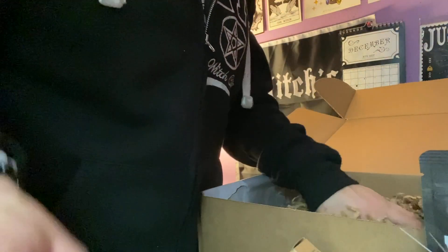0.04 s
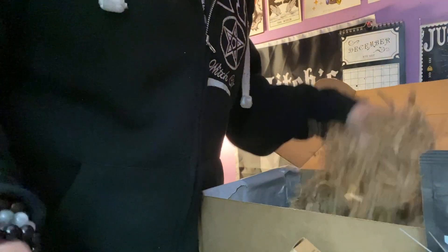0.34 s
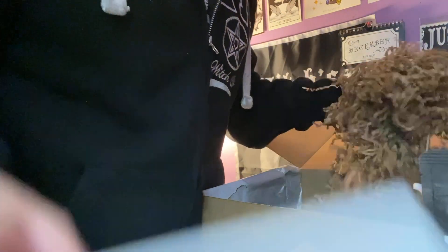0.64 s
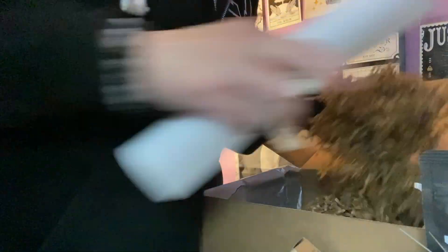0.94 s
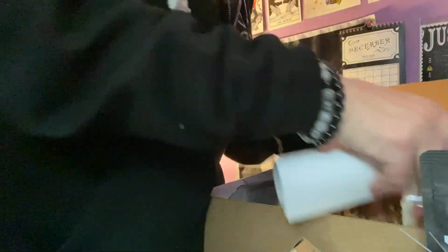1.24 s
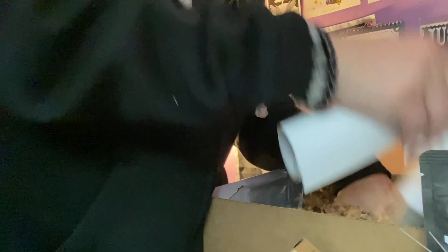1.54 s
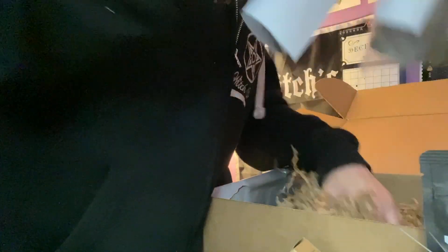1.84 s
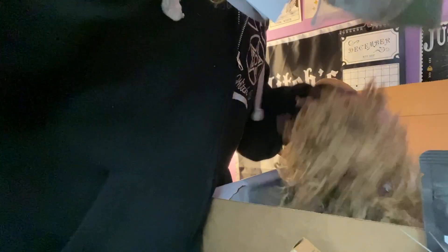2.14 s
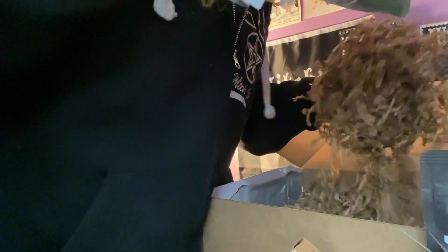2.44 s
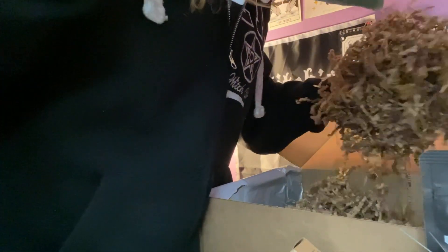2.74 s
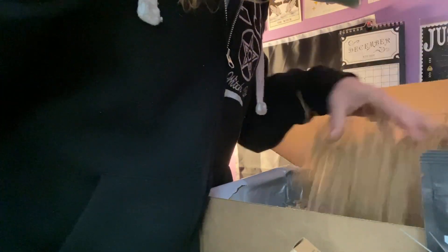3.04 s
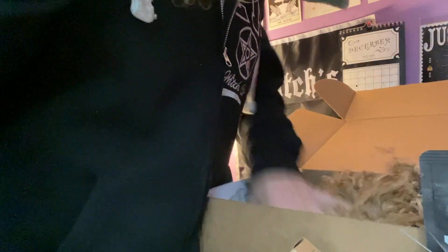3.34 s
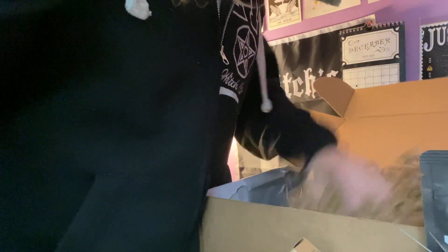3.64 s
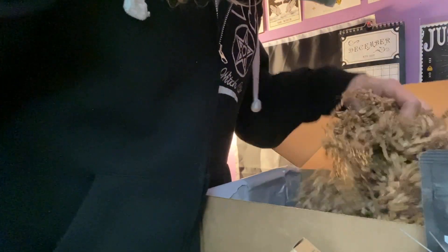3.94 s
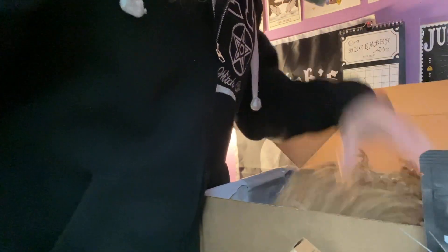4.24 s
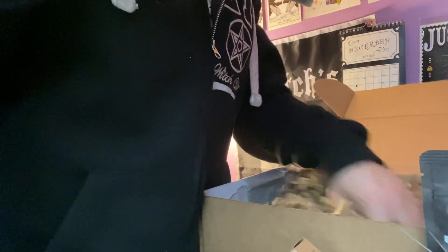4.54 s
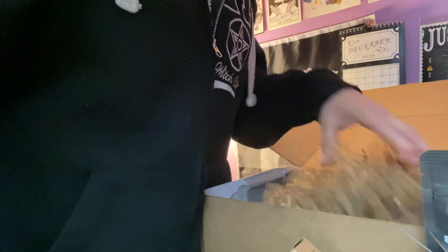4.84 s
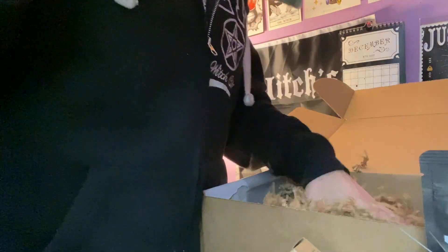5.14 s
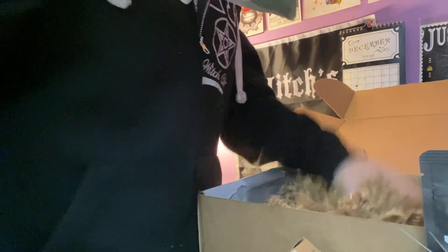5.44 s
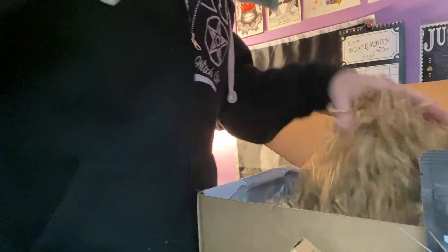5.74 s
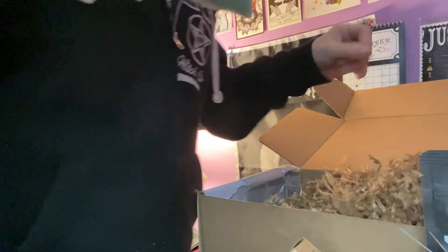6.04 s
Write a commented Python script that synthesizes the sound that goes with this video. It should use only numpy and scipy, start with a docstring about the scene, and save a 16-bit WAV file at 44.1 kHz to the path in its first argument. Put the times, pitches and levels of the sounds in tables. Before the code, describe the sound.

Shredded paper rustles from the start as a hand digs through a cardboard box, close and slightly to the right. The dry hiss swells and dips, mixed with crackles and dull rubbing on the box walls. At about 0.9 seconds the box takes a loud hollow knock and two smaller thumps. A stiff paper roll slides briefly and is set down with a sharp tap at 1.2 seconds. The rummaging continues, easing around 2 seconds, and a few shreds patter down near 2.7. Between 3 and 3.4 seconds comes a cluster of bumps, scrapes and crisp ticks. Another burst of crunching with a knock runs from 4 to 4.3 seconds. Further rustling strokes and light knocks follow, fading from about 5.7 seconds, with a last faint touch just after 6. A faint low machine hum lies underneath in the small furnished room.

```python
"""Shredded paper hisses and crackles as a hand digs through a cardboard box, lifts tufts and drops them.
The strips catch and slip, the crushed wad buckles, and the box drums along and takes some knocks.
About a second in, a stiff paper roll is set down with a sharp tap.
A machine hums low in the small room. Two microphone openings hear the box from the right."""
import sys
import numpy as np
from scipy import signal
from scipy.fft import rfft, irfft, next_fast_len
from scipy.io import wavfile
from scipy.ndimage import map_coordinates

SR = 44100
rng = np.random.default_rng(int(sys.argv[2]) if len(sys.argv) > 2 else 0)


def log_audio(samples):
    """Write samples as a 16-bit WAV file to the path given in sys.argv[1]."""
    # one column per channel
    frames = np.atleast_2d(samples).T
    # limit to full scale, then quantise
    limited = np.clip(frames, -1, 1)
    pcm = np.round(limited * 32767).astype(np.int16)
    wavfile.write(sys.argv[1], SR, pcm)


N = 273287

# The bright tone of a strip springing free. Each row: frequency in Hz, gain in dB.
SNAP_TONE = [(1500, -19.5), (3000, -6.5), (7000, -0.5), (12000, -1), (15000, -15)]


def amp(db):
    """Turn decibels into a number to multiply by."""
    return 10 ** (np.asarray(db) / 20)


def unit(x):
    """Scale a sound so that its average (rms) level is 1."""
    return x / np.sqrt(np.mean(x ** 2) + 1e-20)


def along(points, hz):
    """Read a value between rows of (Hz, value), with the frequencies spaced by octaves."""
    freqs, values = np.transpose(points)
    return np.interp(np.log(hz + 1), np.log(freqs + 1), values)


def wobble(rate):
    """A smooth curve through `rate` random values a second."""
    values = rng.standard_normal(int(N * rate / SR) + 4)
    return map_coordinates(values, [np.arange(N) * rate / SR])


def filtered(x, response):
    """Scale and shift each frequency of a sound by response(hz)."""
    size = next_fast_len(N + SR // 2)
    return irfft(rfft(x, size) * response(np.fft.rfftfreq(size, 1 / SR)), size)[..., :N]


def coloured(x, tone):
    """Shape a sound's tone with rows of (Hz, dB)."""
    return filtered(x, lambda hz: amp(along(tone, hz)))


def fade(t, t60):
    """Die away by 60 dB in t60 seconds, the fade time."""
    return np.exp(-np.log(1000) * t / t60)


def swell(t, middle, length):
    """Rise smoothly to 1 at `middle` and fall again."""
    return np.exp(-(2 * (t - middle) / length) ** 2)


def ringing(t, tones):
    """Add up fading tones from rows of (Hz, dB, fade time)."""
    return sum(amp(db) * fade(t, t60) * np.sin(2 * np.pi * hz * t) for hz, db, t60 in tones)


def add(track, start, sound):
    """Mix a sound into a track at `start` seconds."""
    part = track[..., round(start * SR):][..., :sound.shape[-1]]
    part += sound[..., :part.shape[-1]]


def machine_hum():
    """A machine hums unsteadily over the dull noise of the room."""
    # The hum's tones. Each row: pitch in Hz, level at the start in dB, level at the end in dB.
    tones = [(39.3, -55, -55), (49, -53, -51.5), (64.2, -59, -49.5), (97.7, -61, -67)]
    # The room's own noise. Each row: frequency in Hz, gain in dB.
    air_tone = [(22, -43), (30, -29), (45, 0.5), (60, -2.5), (82, -11.5), (110, -2.5), (150, -2),
                (200, -16), (255, -4), (400, -26), (1000, -31.5), (3000, -48.5), (15000, -71.5)]
    hum, t = np.zeros(N), np.arange(N) / SR
    for hz, first_db, last_db in tones:
        level = np.sqrt(2) * amp(np.linspace(first_db, last_db, N))
        hum += level * np.sin(2 * np.pi * hz * t + 0.53 * wobble(2.39))
    air = rng.standard_normal(N) + 0.53 * rng.standard_normal((2, N))
    return hum + amp(-51) * unit(coloured(air, air_tone))


def room_echo(x):
    """A small, furnished room gives a short echo whose high notes die first."""
    # How long the echo lasts. Each row: frequency in Hz, fade time in seconds.
    fade_times = [(150, 0.22), (1000, 0.098), (10000, 0.0092)]
    hz, t, noise = signal.stft(rng.standard_normal((2, SR // 2)), SR, nperseg=256)
    tail = signal.istft(noise * fade(t, along(fade_times, hz)[:, None]), SR, nperseg=256)[1]
    tail = np.pad(tail / np.linalg.norm(tail[0]), ((0, 0), (SR // 250, 0)))  # arrives 4 ms late
    return signal.fftconvolve(x, tail, axes=1)[:, :N]


def at_microphones(x, levels, phases):
    """Each of the two openings gets every frequency at its own level and point in the wave (phase)."""
    side = np.array([[0.5], [-0.5]])
    return filtered(x, lambda hz: amp(side * along(levels, hz)) * np.exp(1j * side * along(phases, hz)))


def cardboard(hz):
    """How strongly the box walls answer each frequency; the soft board swallows the high notes."""
    # The pitches the walls ring at. Each row: pitch in Hz, width in Hz, gain in dB.
    resonances = [(123.5, 45, -7.5), (265.5, 38, -8), (371, 48, -1), (590, 156, -1.5), (649, 58, 3.5),
                  (709, 47.5, -1), (925, 237, -7.5), (1054, 237, -8.5), (1256, 52, -12)]
    top_hz = 2240  # above this the walls give off little sound
    walls = sum((-1) ** k * amp(db) * 1j * hz * width / (pitch ** 2 - hz ** 2 + 1j * hz * width)
                for k, (pitch, width, db) in enumerate(resonances))
    return walls / (1 + 1j * hz / top_hz - (hz / top_hz) ** 2)


def slips(rate, spread_db, life_ms):
    """Paper sticks and slips `rate` times a second, making tiny stereo noise bursts of uneven size."""
    # How alike left and right are. Each row: frequency in Hz, likeness (1 means the same).
    likeness = [(100, 1), (300, 0.98), (700, 0.97), (1300, 0.39), (3000, 0.081), (6500, 0.037), (8500, 1),
                (15000, 1)]
    happens = rng.random(N) < rate / SR
    size = amp(spread_db * np.clip(rng.standard_normal(N), -2, 2))
    decay = np.exp(-1000 / (life_ms * SR))
    energy = signal.lfilter([1], [1, -decay], happens * size ** 2)
    bursts = np.sqrt(energy) * rng.standard_normal((2, N))
    angle = lambda hz: np.arccos(np.clip(along(likeness, hz), -1, 1)) / 2
    mid, side = filtered(bursts, lambda hz: np.array([np.cos(angle(hz)), np.sin(angle(hz))]))
    return np.array([mid + side, mid - side])


def crinkles(rate, pitch_hz, spread_db, cycles):
    """Tiny paper clicks, `rate` a second; each rings for some cycles at its own pitch and place."""
    starts = np.flatnonzero(rng.random(N) < rate / SR)
    pitch, size, place = rng.standard_normal((N, 3))[starts].T[..., None]
    hz = np.clip(pitch_hz * np.exp(0.55 * pitch), 1000, 14000)
    samples = np.arange(SR // 100)
    turns = hz * samples / SR
    rings = amp(spread_db * np.clip(size, -2, 2)) * np.sin(2 * np.pi * turns) * np.exp(-turns / cycles)
    index = (starts[:, None] + samples).ravel()
    return np.array([np.bincount(index, (rings * amp(ear * 3.3 * place)).ravel(), N)[:N]
                     for ear in (1, -1)])


def chatter(length, hz, sharpness):
    """One stroke of rubbing: noise around one pitch, narrower as the sharpness goes up."""
    stroke = signal.windows.tukey(int(length * SR), 0.6)
    b, a = signal.iirpeak(hz, sharpness, SR)
    band = signal.lfilter(b, a, signal.lfilter(b, a, rng.standard_normal(SR // 2)))
    return unit(band[:len(stroke)] * stroke[:len(band)])


def shifting_pockets(x):
    """Pockets in the wad change shape, so the pitches they boost come and go."""
    depth_db, shifts_per_s, shifts_per_octave = 3, 9, 5
    hz, t, spectrum = signal.stft(x, SR, nperseg=512)
    grid = np.meshgrid(shifts_per_octave * np.log2(hz + 1), shifts_per_s * t, indexing="ij")
    drift = map_coordinates(rng.standard_normal((80, 80)), grid, mode="mirror")
    return signal.istft(spectrum * amp(depth_db * np.clip(drift, -2, 2)), SR, nperseg=512)[1][:, :N]


def trickles():
    """Shreds fall from a lifted tuft and land one by one, each with a small dry pat."""
    # Each row: fullest moment in seconds, length in seconds, level in dB.
    falls = [(0.415, 0.37, -58), (0.6, 0.053, -64), (2.658, 0.12, -56), (4.764, 0.12, -60)]
    # The tone of the pats. Each row: frequency in Hz, gain in dB.
    pat_tone = [(700, -3), (1200, -4.5), (2600, -1.5), (4500, -4), (9000, -13)]
    t = np.arange(N) / SR
    level = sum(amp(db) * swell(t, middle, length) for middle, length, db in falls)
    pats = crinkles(260, pitch_hz=2200, spread_db=3, cycles=4)
    return level * unit(coloured(pats, pat_tone))


def scrapes():
    """Paper or card dragged over an edge chatters around its own pitch."""
    # Each row: start in seconds, length in seconds, pitch in Hz, level in dB.
    drags = [(0.112, 0.037, 387, -49.5), (0.167, 0.1, 2560, -47), (0.212, 0.037, 1140, -47.5),
             (0.534, 0.021, 1790, -48), (1.361, 0.2, 2790, -50.5), (1.582, 0.05, 660, -42),
             (1.686, 0.36, 326, -48), (2.772, 0.045, 360, -44.5), (2.845, 0.038, 1040, -46.5),
             (2.908, 0.038, 710, -46), (3.099, 0.064, 406, -37), (3.146, 0.058, 960, -37),
             (3.207, 0.056, 943, -33.5), (3.295, 0.19, 339, -48), (4.152, 0.083, 1380, -46),
             (4.25, 0.18, 747, -44), (4.258, 0.1, 1980, -45.5), (4.637, 0.024, 1660, -44),
             (5.068, 0.029, 547, -46), (6.163, 0.048, 1440, -59)]
    track = np.zeros((2, N))
    for start, length, hz, db in drags:
        add(track, start, amp(db) * chatter(length, hz, sharpness=3.1))
    return track


def crunches():
    """A fold of the wad gives way in a quick, dying run of cracks."""
    # Each row: start in seconds, level in dB.
    folds = [(0.226, -43.5), (1.19, -50.5), (2.131, -49.5), (2.229, -47), (2.371, -62), (2.62, -45),
             (2.716, -46), (2.779, -41), (2.857, -59), (2.933, -49), (3.027, -50), (3.064, -40),
             (4.003, -39.5), (4.161, -38), (4.19, -39), (4.283, -39), (5.452, -48.5)]
    # The tone of the cracks. Each row: frequency in Hz, gain in dB.
    crack_tone = [(600, -43), (1100, 4.5), (1900, -1), (2400, 3), (3100, 1), (4500, -12.5), (10000, -26)]
    level, t = np.zeros(N), np.arange(SR // 6) / SR
    for start, db in folds:
        add(level, start, amp(db) * fade(t, 0.1))
    return level * unit(coloured(slips(2200, spread_db=6, life_ms=0.63), crack_tone))


def snaps():
    """A creased strip springs free and catches once more, making a bright double tick."""
    # Each row: start in seconds, relative level in dB.
    releases = [(0.574, -28), (0.9122, -20), (1.128, -24.5), (3.173, -22), (3.3255, -22), (3.3407, -19),
                (3.5265, -20.5), (3.983, -18), (4.004, -27), (4.278, -28), (5.7481, -35), (6.040, -47)]
    track, t = np.zeros((1, N)), np.arange(SR // 20) / SR
    for start, db in releases:
        gap_s = 0.0025 * rng.uniform(0.5, 1.6)
        for delay, tick_db in ((0, -13), (gap_s, -18.5)):
            add(track, start + delay, amp(db + tick_db) * fade(t, 0.022) * rng.standard_normal(len(t)))
    return shifting_pockets(coloured(track, SNAP_TONE))


def thumps():
    """A heavy bump sets a whole panel of the box booming."""
    # Each row: start in seconds, level in dB, pitch in Hz, fade time in seconds.
    booms = [(0.9243, -8.5, 385, 0.049), (0.967, -30.5, 123, 0.29), (0.996, -24.5, 78, 0.12),
             (1.121, -34.5, 107.5, 0.16), (2.73, -34, 127, 0.11), (3.066, -22.5, 121, 0.052),
             (3.069, -23, 190, 0.073), (4.056, -34.5, 250, 0.2)]
    track, t = np.zeros(N), np.arange(SR // 3) / SR
    onset = 1 - np.exp(-t / 0.0013)
    for start, db, hz, t60 in booms:
        add(track, start, onset * ringing(t, [(hz, db, t60)]))
    return track


def knocks():
    """A struck spot of cardboard bends to and fro, scuffs the paper and sets the box and flap ringing."""
    # Each row: start in seconds, strength in dB, the spot's pitch in Hz, scuff in dB, flap ring in dB.
    blows = [(0.008, -51, 603, -28, -52.5), (0.9238, -4.5, 618, -23, -47), (0.9671, -16, 265, -45, -50),
             (0.998, -20, 507, -38, -49), (1.38, -37, 600, -41, -56), (1.624, -23, 500, -44, -49),
             (1.776, -31, 706, -41, -34), (2.133, -32.5, 730, -35, -37), (2.248, -33.5, 470, -35, -66),
             (2.372, -38, 795, -36.5, -50), (2.780, -26, 690, -32, -37), (3.029, -33, 445, -36, -59),
             (3.063, -29, 317, -22.5, -48), (3.213, -20, 620, -27, -54), (3.239, -17, 597, -49, -51),
             (3.259, -20, 590, -52, -58), (3.367, -27, 590, -57, -51), (3.953, -40, 700, -57, -46),
             (3.98, -34, 660, -27.5, -52), (4.004, -23, 730, -28.5, -36), (4.313, -39, 734, -52, -35.5),
             (4.498, -28, 630, -33, -51), (5.068, -56, 387, -40, -40), (5.357, -34, 685, -51, -54),
             (5.449, -36, 408, -38, -48.5), (5.478, -31, 390, -31.5, -66), (5.549, -29, 594, -45, -57),
             (5.854, -42, 427, -45.5, -68), (6.156, -42, 342, -36, -46)]
    # The open flap's tones. Each row: pitch in Hz, relative level in dB, fade time in seconds.
    flap_tones = [(715, 5, 0.12), (1200, -3, 0.056)]
    # Paper pinched by a blow. Each row: frequency in Hz, gain in dB.
    scuff_tone = [(500, -3), (1100, 3.5), (1900, -6), (3000, -13.5), (5000, -25), (12000, -27)]
    flex, flap, scuff = np.zeros(N), np.zeros(N), np.zeros((2, N))
    t = np.arange(SR // 4) / SR
    soft_onset = 1 - np.exp(-(t / 0.00074) ** 2)
    flap_ring = (1 - np.exp(-t / 0.0059)) * ringing(t, flap_tones)
    pinch = (1 - np.exp(-t / 0.00081)) * fade(t, 0.09)
    for start, db, hz, scuff_db, flap_db in blows:
        t60 = 0.024 / (1 + 0.48 * amp(db))  # a hard blow crushes the board and dies sooner
        add(flex, start, soft_onset * ringing(t, [(hz, db + 3, t60)]))
        add(flap, start, amp(flap_db) * flap_ring)
        add(scuff, start, amp(scuff_db) * pinch * rng.standard_normal((2, len(t))))
    walls = filtered(amp(-20) * flex + amp(10.5) * scuff[0], cardboard)
    pan = amp([[-0.5], [0.5]])  # the struck walls lie further right than the paper
    return pan * (flex + flap + walls + amp(0.7) * coloured(scuff, scuff_tone))


def paper_roll():
    """The stiff roll slides along the box and taps something hard: a crack and a very short ring."""
    # The roll's tones. Each row: pitch in Hz, relative level in dB, fade time in seconds.
    tones = [(1680, 7, 0.012), (1960, -9, 0.034), (2890, -8, 0.015), (3260, -16.5, 0.034),
             (5950, -10, 0.0095), (8900, -16, 0.0099)]
    # Each row: start in seconds, strength of the tap in dB.
    taps = [(0.9, -40), (0.9125, -41.5), (0.922, -26), (1.1805, -10)]
    # Each row: start in seconds, length in seconds, level in dB.
    slides = [(0.898, 0.013, -45.5), (1.006, 0.13, -41), (1.126, 0.047, -36), (1.171, 0.055, -45)]
    track, t = np.zeros(N), np.arange(SR // 8) / SR
    ring = ringing(t, tones)
    onset = 1 - np.exp(-(t / 0.0009) ** 2)
    for start, db in taps:
        burst = fade(t, 0.02) * rng.standard_normal(len(t))
        crack = signal.lfilter(*signal.butter(1, 5000, fs=SR), burst)
        add(track, start, amp(db) * onset * (ring + amp(-5) * crack))
    for start, length, db in slides:
        add(track, start, amp(db) * chatter(length, hz=2010, sharpness=2.9))
    return track


def handwork():
    """How hard the hand rubs, crushes and slides the paper, in dB: digs start fast, tufts swell gently."""
    # The hand digs in and presses the paper against the box.
    # Each row: start, rise time and length in seconds, sliding of strips in dB, rubbing on the box in dB.
    digs = [(-0.04, 0.024, 0.047, -41.5, -34.5), (0.116, 0.064, 0.15, -46.5, -46),
            (0.458, 0.11, 0.32, -82, -53), (0.886, 0.017, 0.14, -57, -38.5),
            (0.997, 0.043, 0.09, -41.5, -40), (1.113, 0.019, 0.016, -36, -34.5),
            (1.176, 0.018, 0.13, -54.5, -41), (1.292, 0.087, 0.28, -45.5, -38.5),
            (1.567, 0.033, 0.11, -49, -40.5), (1.678, 0.038, 0.12, -51, -42.5),
            (1.831, 0.024, 0.14, -53, -47.5), (2.678, 0.022, 0.19, -48, -44.5),
            (2.89, 0.016, 0.021, -59, -62), (3.054, 0.028, 0.22, -44.5, -37), (3.29, 0.019, 0.19, -50, -50),
            (3.44, 0.018, 0.16, -68, -49.5), (3.802, 0.037, 0.19, -62, -47.5),
            (3.994, 0.01, 0.052, -43.5, -32), (4.114, 0.036, 0.27, -46, -41),
            (4.442, 0.015, 0.19, -67, -51.5), (4.618, 0.0065, 0.046, -50, -43),
            (4.698, 0.14, 0.28, -54.5, -43), (5.033, 0.025, 0.064, -55, -41), (5.32, 0.062, 0.33, -57, -51),
            (5.507, 0.053, 0.09, -50.5, -42.5), (5.704, 0.023, 0.052, -62, -50),
            (6.03, 0.0053, 0.043, -63, -58.5)]
    # A tuft is teased loose or trickles back, clear of the walls.
    # Each row: fullest moment in seconds, length in seconds, sliding in dB.
    tufts = [(0.144, 0.12, -49.5), (0.288, 0.19, -49.5), (0.7, 0.2, -61), (0.874, 0.11, -49.5),
             (2.348, 0.23, -53), (2.63, 0.16, -46), (2.88, 0.15, -57.5), (3.747, 0.53, -48.5),
             (4.513, 0.11, -46), (5.15, 0.34, -48), (5.413, 0.18, -45.5)]
    t = np.arange(N) / SR
    pause_db = -4.5 * swell(t, middle=2.995, length=0.065)  # just before a clump is dropped
    resting_s = np.maximum(t - 5.65, 0)  # time since the hand left
    # The paper keeps shifting between strokes, then comes to rest.
    slide_power = amp(-53.5 + pause_db - 124 * resting_s) ** 2
    rub_power = amp(-54 + pause_db - 76 * resting_s) ** 2
    release_db_per_s = 121.5
    for start, rise, length, strips_db, box_db in digs:
        age = np.maximum(t - start, 0)
        stroke = np.minimum(age / rise, 1) * amp(-release_db_per_s * np.maximum(age - length, 0))
        slide_power += (amp(strips_db) * stroke) ** 2
        rub_power += (amp(box_db) * stroke) ** 2
    for middle, length, db in tufts:
        slide_power += (amp(db) * swell(t, middle, length)) ** 2
    rub_db, slide_db = 10 * np.log10(rub_power), 10 * np.log10(slide_power)
    force_db = 0.51 * rub_db + 0.49 * slide_db  # the wad buckles when both pressed and moved
    crush_db = -47 + 1.32 * (force_db + 45)
    return rub_db, crush_db, slide_db


def rustle():
    """Strips slide, duller under the hand, while the wad buckles and the box drums along."""
    # The tones of four paper sounds. Each row: frequency in Hz, gain in dB.
    loose_tone = [(900, -45.5), (1900, -23), (2700, -16), (4000, -6.5), (7500, 0), (15000, -2.5)]  # loose strips
    pressed_tone = [(900, -20), (2300, 3), (2800, 5), (4000, -6.5), (5500, -4.5), (7500, 2.5),
                    (15000, -5.5)]  # strips under the hand
    wad_tone = [(500, -46), (1100, -1.5), (1450, -3), (1750, 0.5), (2000, -1.5), (2350, -8), (2750, -6),
                (4000, -5.5), (8000, -12.5)]  # the crushed wad
    crease_tone = [(1200, 2), (2000, 10), (7000, 6), (15000, -47)]  # buckling creases
    rub_db, crush_db, slide_db = handwork()
    effort = amp(0.22 * (slide_db - slide_db.max()))  # harder work sets off more slips
    even = 1 / np.sqrt(effort)  # so that more slips alone do not mean more loudness
    clumps = amp(0.8 * wobble(35))  # strips catch and let go in tufts
    sliding = even * slips(6500 * effort, spread_db=4.2, life_ms=0.9)
    pressed_share = 1 / (1 + amp(4 + slide_db - rub_db) ** 2)  # half when rubbing is 4 dB over sliding
    strips = (1 - pressed_share) * unit(coloured(sliding, loose_tone))
    strips += pressed_share * unit(coloured(sliding, pressed_tone))
    crushing = even * slips(1800 * effort, spread_db=4, life_ms=5)
    wad = unit(shifting_pockets(coloured(crushing, wad_tone)))
    buckling = even * crinkles(900 * effort, pitch_hz=3130, spread_db=-0.5, cycles=17)
    creases = unit(coloured(buckling, crease_tone))
    walls = unit(filtered(slips(900, spread_db=4.5, life_ms=8), cardboard))
    flicks = even * slips(160 * effort, spread_db=3, life_ms=0.84)  # single strips flick free
    ticks = unit(coloured(flicks, SNAP_TONE))
    hiss = amp(slide_db - 0.22) * (strips + amp(-17) * ticks)
    crackle = amp(crush_db - 1) * wad + amp(crush_db - 10) * creases
    return clumps * (hiss + crackle + amp(rub_db - 1) * walls)


def scene():
    """The paper and box on the right and the roll far to the right, with the room's echo and hum."""
    # Where each sits between the microphones. Each row: frequency in Hz, left minus right level in dB.
    box_levels = [(100, 0), (380, -4), (700, -4.5), (1200, -3.5), (2400, -0.5), (8000, 0)]
    roll_levels = [(500, 6), (1700, -9.5), (3000, 0), (10000, -10)]
    # Each row: frequency in Hz, how far the left wave runs ahead in radians.
    box_phases = [(100, 0), (340, -0.6), (650, -1.79), (950, -2), (2500, -2.5), (3400, -6.3), (4300, -7.6),
                  (6500, -12.2), (8600, -9.6), (9500, -9.3), (12000, -6.3), (14200, -3.3), (15500, -3)]
    roll_phases = [(100, 0), (600, -1.7), (1700, -4.1), (3000, -4.6), (6000, -5), (11000, -3.9)]
    paper = rustle() + trickles() + crunches() + scrapes() + snaps()
    direct = at_microphones(paper + knocks() + thumps(), box_levels, box_phases)
    direct += at_microphones(paper_roll(), roll_levels, roll_phases)
    return direct + amp(-13) * room_echo(direct) + machine_hum()


def record(dry):
    """Cut away the very highest frequencies."""
    return filtered(dry, lambda hz: hz < 15850)


dry = scene()
out = record(dry)
log_audio(out)
```